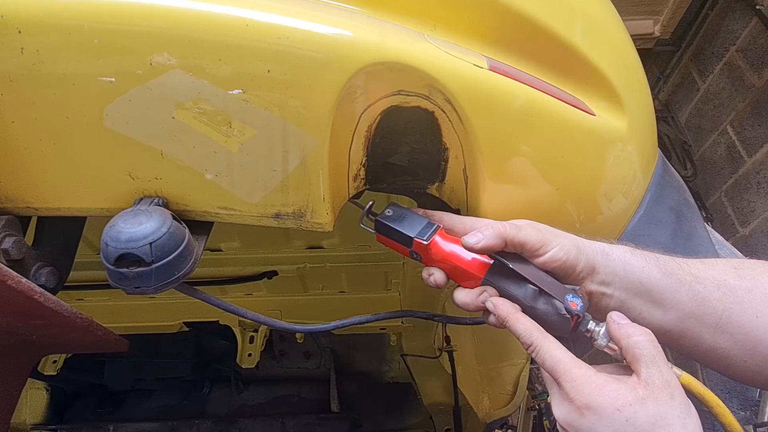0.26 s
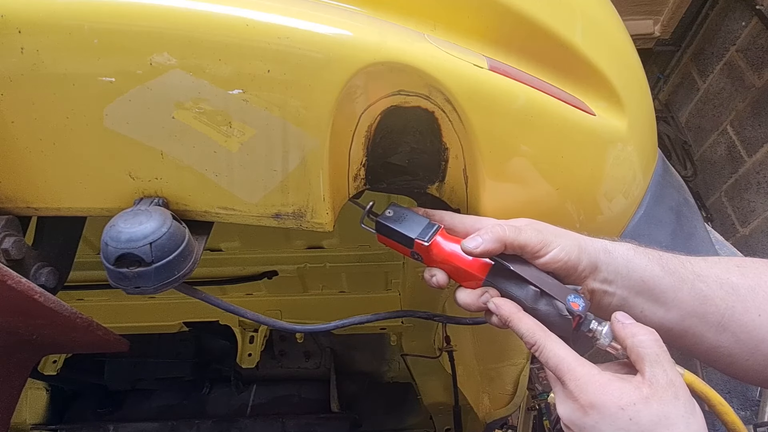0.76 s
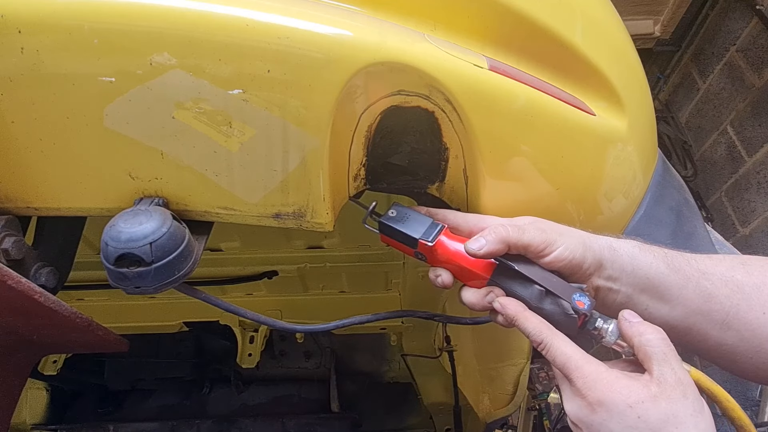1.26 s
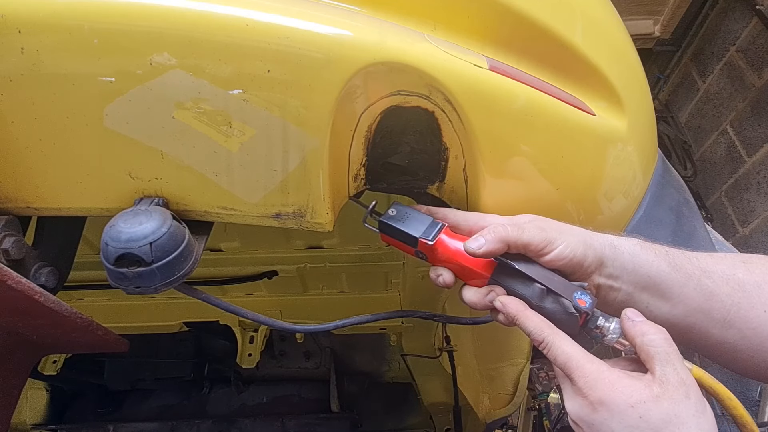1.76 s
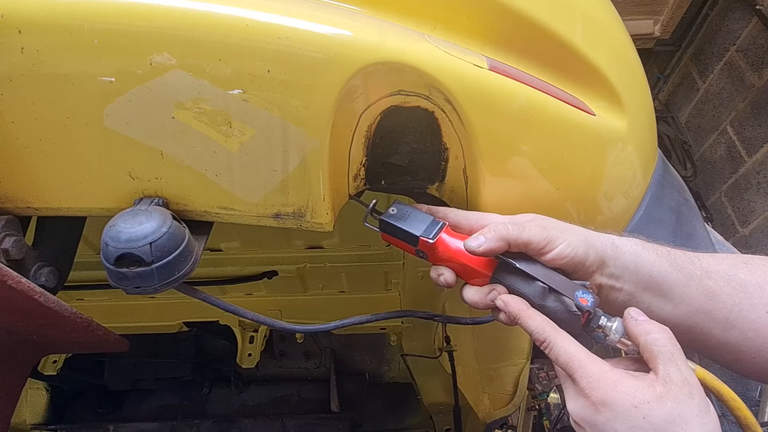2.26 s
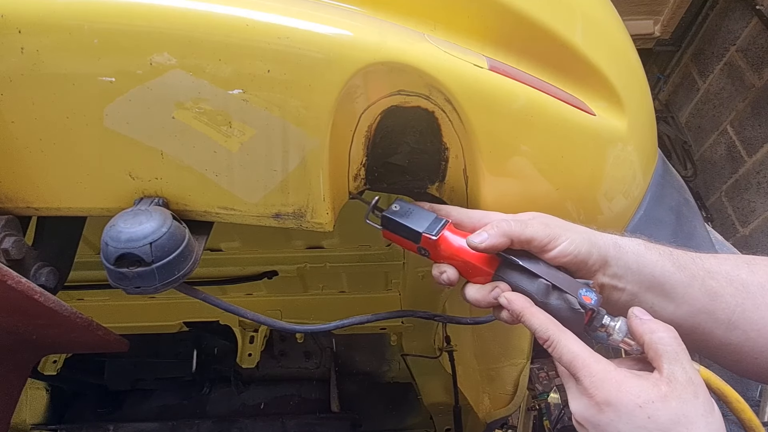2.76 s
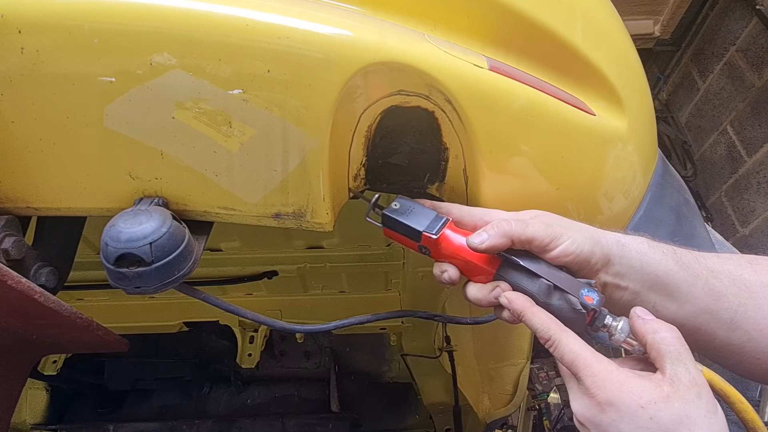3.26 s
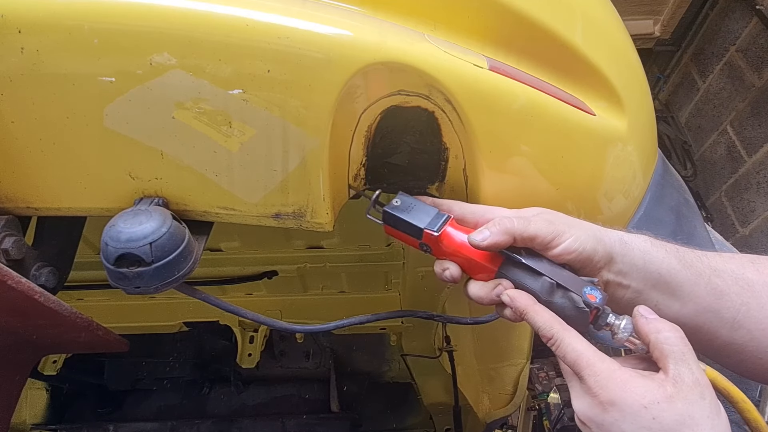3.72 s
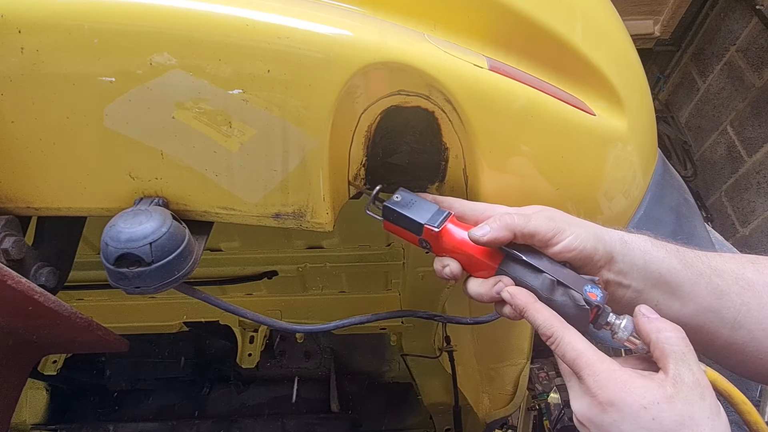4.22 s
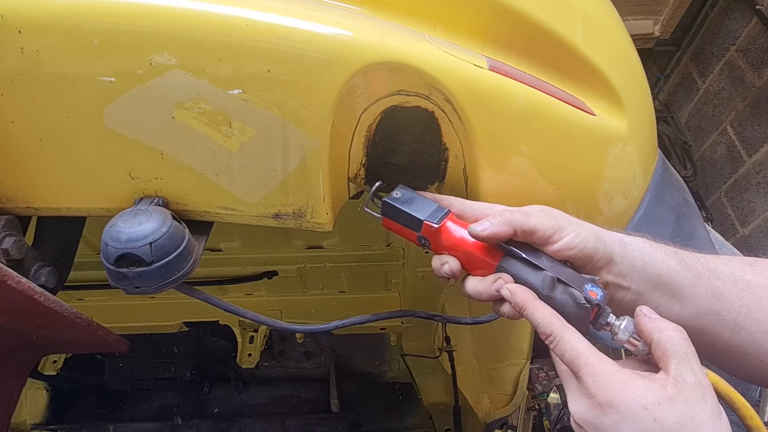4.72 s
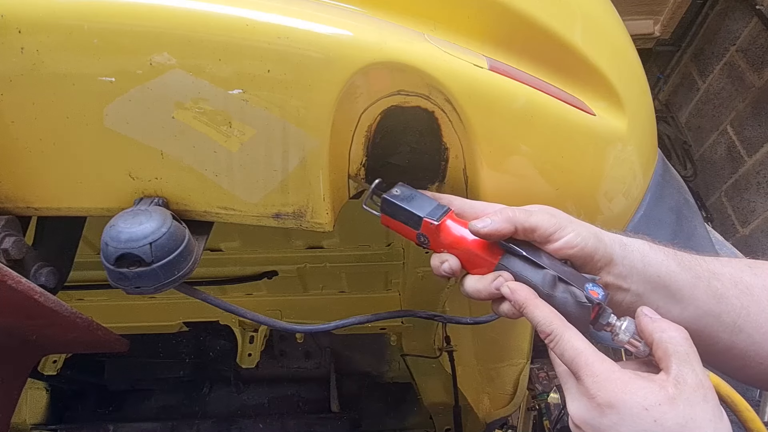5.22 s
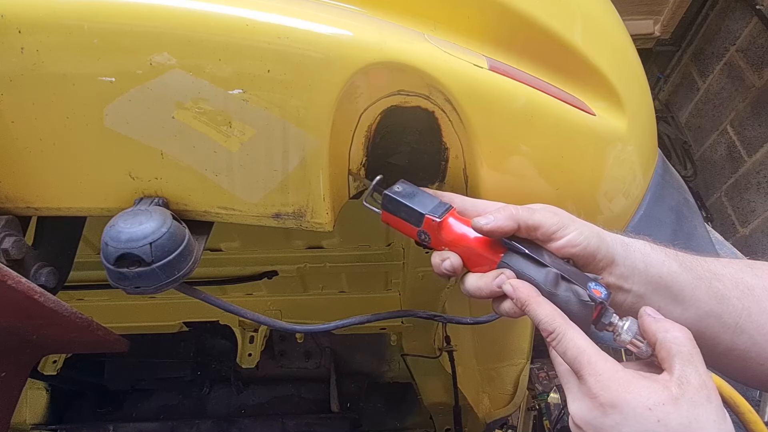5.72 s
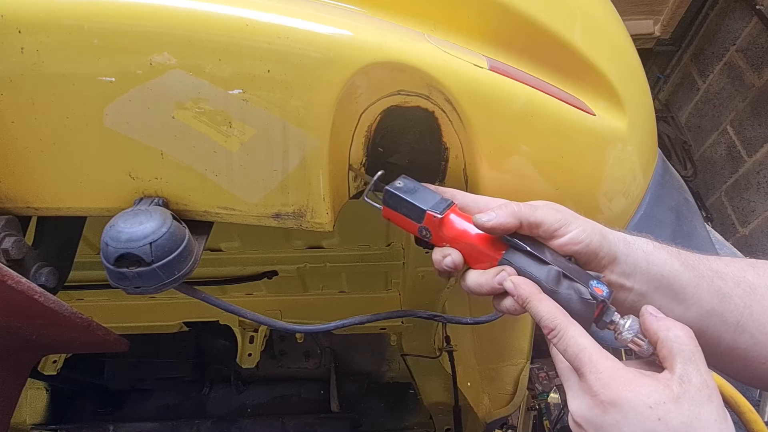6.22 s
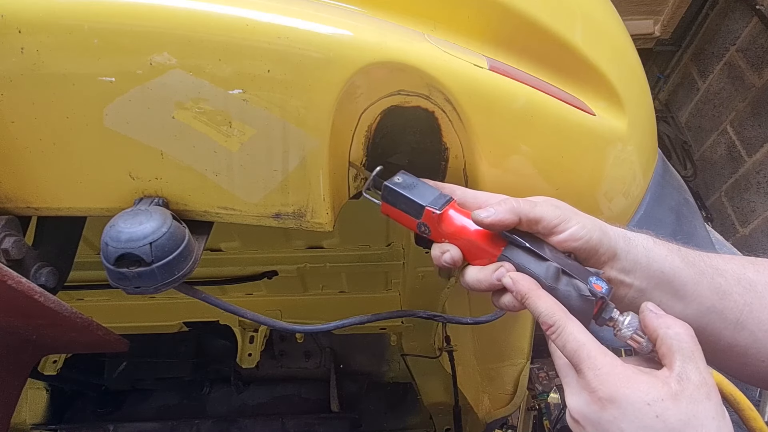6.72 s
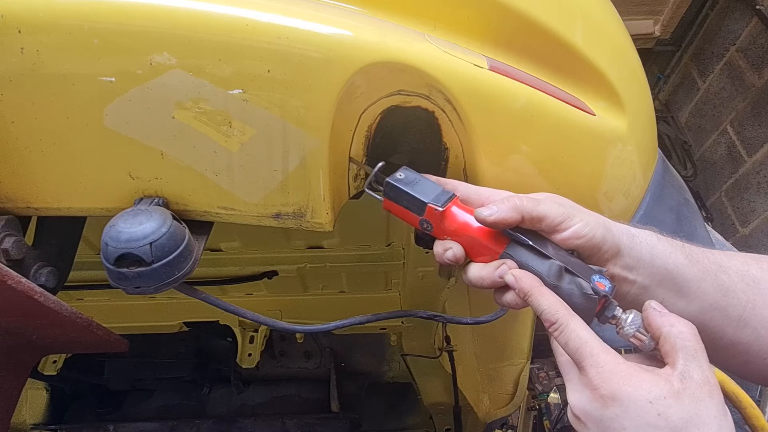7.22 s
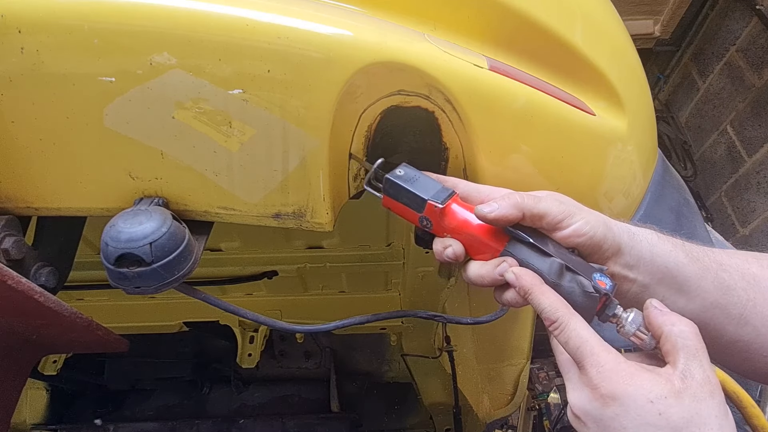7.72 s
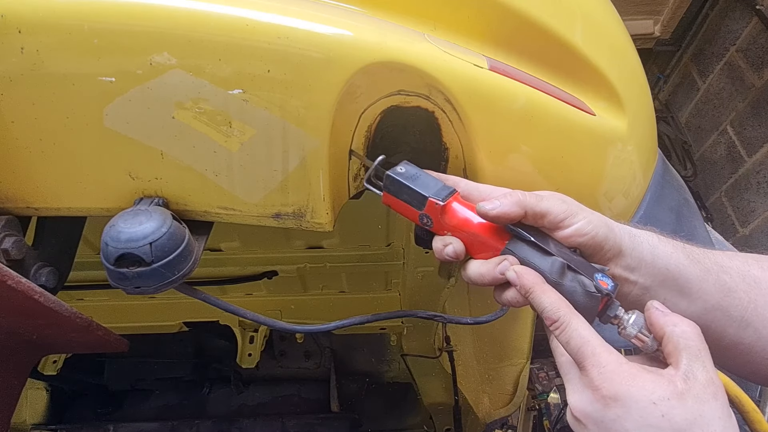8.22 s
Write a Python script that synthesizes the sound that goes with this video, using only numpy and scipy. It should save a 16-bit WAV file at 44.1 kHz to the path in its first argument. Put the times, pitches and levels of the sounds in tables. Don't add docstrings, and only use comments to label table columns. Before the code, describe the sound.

Steady, raspy air-saw buzz with rapid valve popping, loud air hiss and rattling parts, sagging slightly in pitch as it bites into a plastic panel.

```python
import sys
import numpy as np
from scipy import signal
from scipy.fft import rfft, irfft, next_fast_len
from scipy.io import wavfile
from scipy.ndimage import uniform_filter1d, map_coordinates

SR = 44100
rng = np.random.default_rng(int(sys.argv[2]) if len(sys.argv) > 2 else 0)


def voltage_ratio(level):
    return 10 ** (np.asarray(level, float) / 20)


def master(y):
    cut = np.clip(np.atleast_2d(y).T, -1, 1)
    pcm = np.round(cut * 32767)
    wavfile.write(sys.argv[1], SR, pcm.astype(np.int16))


N = 373968
PAD = next_fast_len(N, real=True)
TIME = np.arange(N) / SR
FREQ = np.fft.rfftfreq(PAD, 1 / SR)
HALVES = np.array([[0.5], [-0.5]])

STAGE_S = [.6, 1.0, 1.45, 1.6, 1.9, 1.95, 4.8, 6.2]
# start/s, length/s, share
SLACK = [(1.93, 0.373, 0.98)]


def unit(x):
    return x / np.sqrt(np.mean(x ** 2))


def curves(table):
    s, *columns = np.transpose(table)
    return [np.interp(TIME, s, c) for c in columns]


def spells(table):
    edge_s = 0.04
    total = 0
    for start, length, size in table:
        inside_s = np.minimum(TIME - start, start + length - TIME)
        total = total + size * np.clip(inside_s / edge_s + 0.5, 0, 1)
    return total


def shape_db(table):
    hz, db = np.transpose(table)
    return np.interp(np.log(FREQ + 1), np.log(hz), db, left=min(db[0], -50), right=min(db[-1], -50))


def colour(x, db):
    return irfft(rfft(x, PAD) * voltage_ratio(db), PAD)[..., :N]


def walk(rate):
    steps = np.repeat(rng.standard_normal(int(N / SR * rate) + 2), repeats=12)
    steps = uniform_filter1d(uniform_filter1d(steps, size=12), size=12)
    return unit(np.interp(TIME * rate * 12, np.arange(len(steps)), steps))


def noise():
    return rng.standard_normal(N)


def orders(turns, pop_db, panel_db, grip_db):
    shake = [(1, -.07), (2, 0), (3, -.18), (4, .17), (5, -.39), (6, -.28)]
    # order, level/dB
    free = [(1, -16), (2, -2), (3, -33), (4, 2), (5, -11.5), (6, -8.5), (7, -9), (8, -4), (9, -13.5),
            (10, -18), (11, -19), (12, -15.5), (13, -17), (14, -15.5), (15, -22.5), (16, -26), (17, -22.5),
            (18, -30), (19, -34), (20, -22)]
    # order, level/dB
    bite = [
        [(1, -13.5), (2, 0.5), (3, -24), (4, -7.5), (5, -10.5), (6, -13.5), (7, -10.5), (8, -5), (9, -12),
         (10, -7.5), (11, -21), (12, -26), (13, -23.5), (14, -27), (15, -22), (16, -22), (17, -31), (18, -33),
         (19, -27), (20, -22.5)],
        [(1, -9), (2, -1), (3, -24), (4, -10.5), (5, -7.5), (6, -10), (7, -8.5), (8, -4.5), (9, -10), (10, -9),
         (11, -17), (12, -23), (13, -24), (14, -18), (15, -23), (16, -21), (17, -36), (18, -31), (19, -31),
         (20, -25)],
    ]
    # order, level/dB
    cut = [(1, -6), (2, 0), (3, -16), (4, -12), (5, -5), (6, -13.5), (7, -10.5), (8, -6), (9, -11.5),
           (10, -11.5), (11, -21), (12, -30), (13, -19.5), (14, -26), (15, -19.5), (16, -34), (17, -30),
           (18, -33.5), (19, -35), (20, -27.5)]
    # order, level/dB
    deep = [(1, -4), (2, 1.5), (3, -15), (4, -7), (5, 0), (6, -8), (7, -9.5), (8, -2), (9, -5.5),
            (10, -12.5), (11, -20.5), (12, -29), (13, -15), (14, -36), (15, -28), (16, -37), (17, -38),
            (18, -28), (19, -42), (20, -27)]
    # order, left lead/rad, left minus right/dB
    ports = [(1, .2, -1), (2, .17, -.4), (3, 0, -1), (4, .1, 2.5), (5, -.2, -1), (6, 2.0, 0), (7, .6, -2.5),
             (8, .4, 2.5), (9, .8, 2.2), (10, .5, .7), (13, 1.4, 2.2), (15, 1.1, -4.5), (20, 2.5, 1.5)]
    grip_share = {1: .1, 4: -0.31, 5: 1.0}
    contact_share = {1: 0.51, 2: 0.67, 4: 0.41}
    # start/s, length/s, level/dB
    damped = [
        (4.25, 0.42, -5),
        (6.1, .3, -6),
        (7.22, .12, -18),
        (7.35, 1.21, -6),
    ]
    slack_fourth_db = 6

    stages = np.array([free, bite[0], bite[0], bite[1], bite[1], cut, cut, deep])[:, :, 1]
    stages = stages - 10 * np.log10(np.sum(voltage_ratio(2 * stages[:, 5:10]), axis=1, keepdims=True))
    panel_db = panel_db + 0.23 * walk(20)
    strength_db = 0.59 * walk(110)
    scatter_db = 0.75 * walk(120)
    early = 0.001 * walk(120)
    port_order, port_lead, port_pan_db = np.transpose(ports)
    out = 0
    for k in range(1, 21):
        lead = np.interp(k, port_order, port_lead)
        pan_db = np.interp(k, port_order, port_pan_db)
        drift_db = {1: 0.6, 2: 0.2, 3: 1.6}.get(k, 0.5) * walk(9)
        db = pop_db - 0.3 + np.interp(TIME, STAGE_S, stages[:, k - 1]) + drift_db
        db = db + grip_share.get(k, 0) * grip_db + contact_share.get(k, 0) * panel_db
        if k == 3:
            db = db + spells(damped)
        if k == 4:
            db = db + slack_fourth_db * spells(SLACK)
        if k > 3:
            db = db + scatter_db
        if k < 7:
            offset = shake[k - 1][1]
        else:
            offset = 0.4423 * k + 0.19 + 0.065 * walk(0.9) + k * early
        sway = lead + 0.029 * k * walk(0.98)
        tone = np.cos(2 * np.pi * (k * turns + offset) + sway * HALVES)
        tone = tone / np.cos(lead / 2).clip(0.4, 1)
        out = out + np.sqrt(2) * voltage_ratio(db + strength_db + pan_db * HALVES) * tone
    return out


def puffs(turns, start, depth, second):
    half = 2 * (turns - start)
    count = np.floor(half)
    phase = half % 1
    size = voltage_ratio(1.7 * rng.standard_normal(4000))[count.astype(int) + 4]
    size = size * np.where(count % 2, second, 1)
    return 1 + depth * size * (1 - np.exp(-phase / 0.039)) * np.exp(-phase / 0.5)


def echoes(x, count, share):
    out = x.copy()
    for lag, sign in rng.random((count, 2)):
        late = np.arange(N) - 30 - 400 * lag - 1.2 * walk(0.4)
        out += share * np.sign(sign - 0.5) * x[late.astype(int).clip(0, N - 1)]
    return out


def exhaust(turns, db):
    # f/Hz, density/dB per Hz
    hiss_early = [(1300, -9.5), (2100, -4), (2380, -9), (2750, -5), (4300, 1), (5000, -1.5), (6200, 1),
                  (7250, -0.5), (7900, -6), (8950, -13.5), (9900, -8), (10900, -7.5), (12100, -4),
                  (13300, -6), (16000, -4.5)]
    # f/Hz, density/dB per Hz
    hiss_late = [(1320, -9.5), (2200, -10), (2700, -15), (2760, -9), (3770, -2), (5640, -4), (6700, 0),
                 (7280, -4), (8930, -15.5), (10000, -6.5), (11200, -11), (12400, -5), (13500, -10),
                 (15100, -5.5), (16000, -15)]
    # f/Hz, left minus right/dB
    balance = [(2000, 5.5), (2800, 5), (4000, -2.5), (5500, -6), (7000, -8.5), (8500, 6), (9300, 2.5),
               (10000, -16.5), (11000, 11.5), (12200, -12), (13500, 7), (15000, -9.5)]

    bright_db = -0.6 + 0.4 * walk(9)
    jet = puffs(turns, start=0.067, depth=9, second=0.59) * voltage_ratio(0.2 * walk(16))
    common = jet * noise()
    air = []
    for lag in (0, 4):
        own = 0.87 * jet * noise()
        air.append(echoes(np.roll(common, lag) + own, count=9, share=0.25))
    air = np.array(air)
    hz, pan_db = np.transpose(balance)
    pan_db = np.interp(FREQ, hz, pan_db) * HALVES
    late = np.interp(TIME, [3.5, 6.0], [0, 1])
    first = unit(colour(air, shape_db(hiss_early) + pan_db))
    last = unit(colour(air, shape_db(hiss_late) + pan_db))
    air = (1 - late) * first + late * last
    low = signal.sosfilt(signal.butter(5, 8800, fs=SR, output="sos"), air)
    high = signal.sosfilt(signal.butter(5, 8800, "high", fs=SR, output="sos"), air)
    return voltage_ratio(db + 3.5) * (unit(low) + voltage_ratio(bright_db - 0.8) * unit(high))


def rattle(turns, db):
    # f/Hz, level/dB
    clatter_shape = [(1200, -17), (1800, 0.5), (2350, -11), (3300, -0.5), (4200, -2.5), (5500, -7),
                     (7000, -3.5), (9000, -12.5)]
    renew_strokes = 70
    pattern = rng.standard_normal((2, 200, 256))
    place = [turns / renew_strokes, turns % 1 * 255]
    clatter = np.array([map_coordinates(p, place, order=1) for p in pattern])
    clatter = clatter * np.exp(-((turns + 0.44 + 0.029) % 1) / 0.63)
    port_db = np.array([[-2.0], [-5.0]])
    return voltage_ratio(db + port_db) * unit(colour(clatter, shape_db(clatter_shape)))


def teeth(turns):
    # f/Hz, level/dB
    rasp_shape = [(80, -1), (180, -0.5), (260, 9.5), (340, 5), (430, -1), (700, 6), (1200, 6),
                  (1600, -10.5), (2300, -22), (3500, -39)]
    # start/s, length/s, level/dB
    tears = [
        (1.03, 0.1, 9.5),
        (1.22, .18, 7),
        (1.85, .5, 5),
        (2.6, 0.23, 5),
        (3.55, .1, 3),
        (4.4, 0.545, 3),
        (7.5, .1, 5),
        (8.2, 0.097, 1),
    ]
    free_bite_db = -6

    strokes = puffs(turns, start=0.45, depth=0.7, second=0.67) * voltage_ratio(0.49 * walk(11))
    shape = shape_db(rasp_shape)
    widen_db = np.clip(3.6 * np.log2((FREQ + 1) / 900), -25, 0)
    mid = colour(strokes * noise(), shape)
    side = colour(strokes * noise(), shape + widen_db)
    rasp = np.array([mid + side, mid - side]) / np.std(mid)
    bass = signal.sosfilt(signal.butter(2, 450, fs=SR, output="sos"), rasp)
    bite_db = -48 + np.interp(TIME, STAGE_S[:2], [free_bite_db, 0]) + spells(tears) + 2 * walk(9)
    return voltage_ratio(0.82 * bite_db + 7.0) * bass + voltage_ratio(0.29 * bite_db - 23.0) * (rasp - bass)


def flutter():
    # f/Hz, level/dB
    gust_shape = [(15, -19), (40, 2.5), (80, 0.5), (120, -7), (200, -35)]
    # start/s, length/s, level/dB
    swings = [(.38, .17, -6), (.69, .07, 5), (.85, .18, -5), (1.42, .18, -8), (1.92, 0.48, 5),
              (2.58, .47, 9), (4.47, .55, 5), (5.08, 0.068, -9), (5.5, 1.9, -1), (7.72, 0.36, -3),
              (8.05, 0.45, 6)]
    common = noise()
    ports = []
    for port_db in (2.0, -4.0):
        buffet = colour(common + 0.96 * noise(), shape_db(gust_shape))
        ports.append(unit(buffet) * voltage_ratio(port_db))
    return voltage_ratio(-47.5 + spells(swings) + 1.3 * walk(14)) * np.array(ports)


def scene():
    # t/s, rate/Hz, grip/dB
    stroke_rate = [(0.0, 145.5, -1.5), (0.42, 146.7, -1.5), (0.78, 141.8, 3.5), (0.88, 139.5, 0),
                   (1.14, 139.2, 1.5), (1.36, 137.0, 1), (1.42, 138.6, -0.5), (1.86, 136.3, 3),
                   (1.96, 139.7, -1.9), (2.24, 139.1, -0.5), (2.36, 137.6, -2.4), (2.84, 137.7, -1),
                   (2.98, 138.5, -10), (3.76, 137.1, -3), (6.86, 135.4, -1.5), (7.32, 133.7, -0.5),
                   (7.72, 135.9, -5.5), (8.47, 134.3, -3)]
    # t/s, valve pop/dB, contact/dB
    drive = [(0.0, -25.5, 1), (1.14, -21.5, 3), (1.28, -21.5, -1), (1.42, -22.5, 1), (1.68, -20.5, 4.5),
             (1.86, -20, 1.5), (1.94, -24.5, 3.5), (2.42, -24.5, 2), (2.48, -27, 1.5), (2.62, -24.5, 1.7),
             (3.96, -24, 2.8), (4.5, -21.5, 0.5), (5.5, -23.5, 0.9), (6.76, -23.0, 2.1),
             (7.28, -23.5, -0.7), (7.76, -24, 1.5), (8.16, -23, 0.5), (8.47, -25, 2)]
    # start/s, length/s, rate shift/Hz
    leans = [(.55, 0.16, -0.076), (3.1, 0.33, .35), (3.55, 0.16, -0.39), (4.15, 0.1, 0.47),
             (4.38, 0.25, -0.53), (4.68, 0.61, 0.56), (5.28, 0.085, -.5), (6.05, .4, -.55),
             (6.5, .12, 0.61), (6.98, .1, -0.25), (7.5, .1, -.3)]
    # start/s, length/s, level/dB
    shoves = [(.04, 0.024, 3), (.25, 0.024, 2.5), (.36, .06, -1.5), (.55, .13, 1.3), (.7, 0.028, 0),
              (.88, 0.072, 2), (3.68, 0.055, 2), (3.95, .05, -2), (4.54, 0.042, -1), (4.63, .05, 1),
              (5.28, 0.079, 1.5), (5.76, 0.09, 1), (6.43, 0.096, -1.8), (6.52, 0.066, 0.5), (6.82, .06, -1),
              (7.02, .06, 1.7)]
    # t/s, slip/strokes
    snags = [
        (1.821, -0.027),
        (1.832, 0.039),
        (1.895, -0.02),
        (1.909, .05),
    ]
    lean_db_per_hz, hiss_db_per_hz, loaded_hz = 0.46, 0.2154, 137
    hiss_under_pop_db, slack_hiss_db = -5, 1.2

    hz, grip_db = curves(stroke_rate)
    pop_db, panel_db = curves(drive)
    surge_db = 0.4653 * walk(75)
    pop_db = pop_db + surge_db + spells(shoves) + lean_db_per_hz * spells(leans)
    air_db = pop_db + hiss_under_pop_db + hiss_db_per_hz * (hz - loaded_hz)
    air_db = air_db + slack_hiss_db * spells(SLACK)
    unsteady = 1 + 0.001986 * walk(30) + 0.000997 * walk(9)
    turns = np.cumsum((hz + spells(leans)) * unsteady) / SR
    for s, slip in snags:
        turns = turns + slip * np.clip((TIME - s) / 0.0084, 0, 1)
    tool = orders(turns, pop_db, panel_db, grip_db) + exhaust(turns, air_db) + rattle(turns, air_db)
    return tool + teeth(turns) + flutter()


def low_pass(x):
    return signal.sosfilt(signal.butter(12, 17080, fs=SR, output="sos"), x)


def record(dry):
    top = signal.ellip(10, 0.2, 80, 15700, fs=SR, output="sos")
    rounded = np.tanh(0.42 * dry) / 0.39
    return low_pass(signal.sosfilt(top, rounded))


dry = scene()
out = record(dry)
master(out)
```